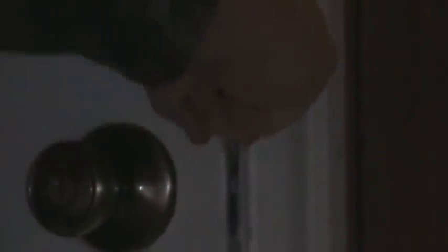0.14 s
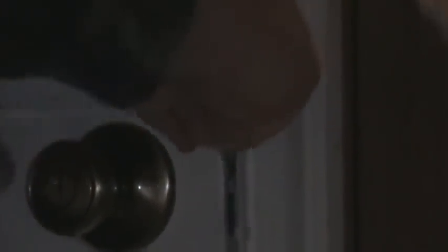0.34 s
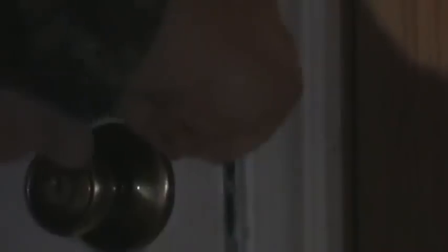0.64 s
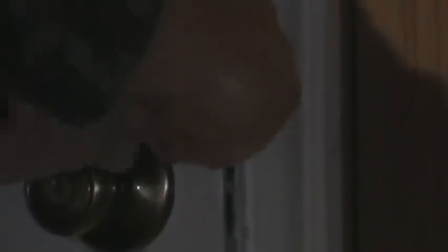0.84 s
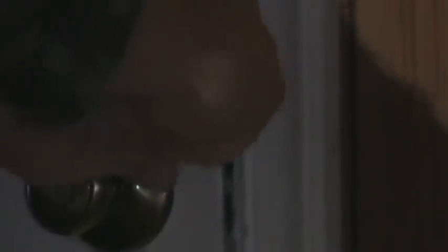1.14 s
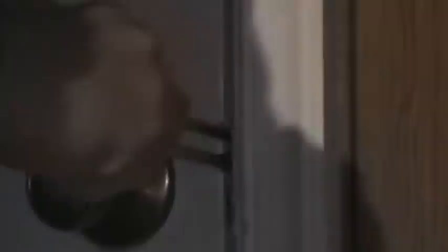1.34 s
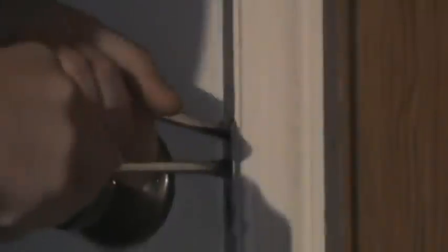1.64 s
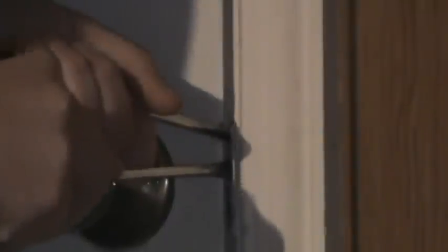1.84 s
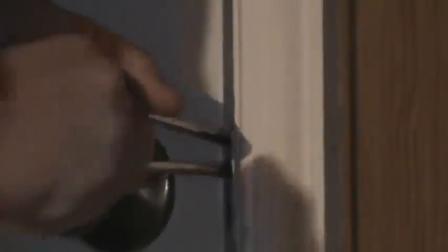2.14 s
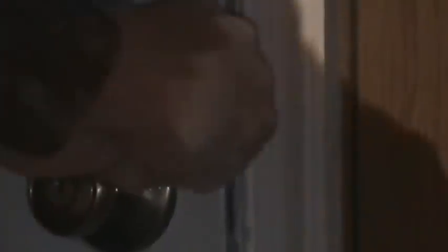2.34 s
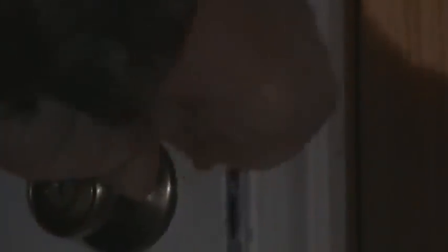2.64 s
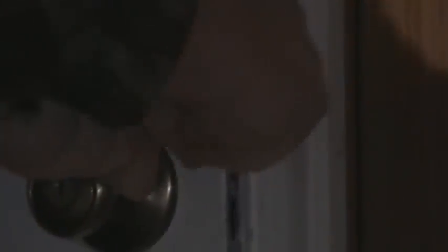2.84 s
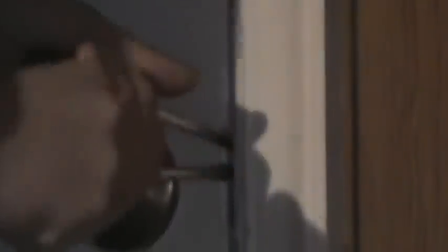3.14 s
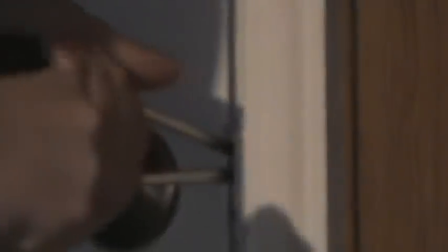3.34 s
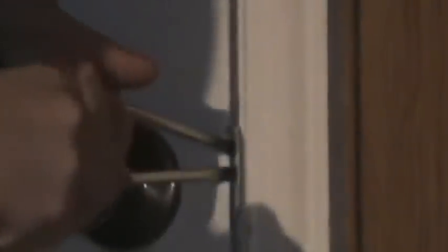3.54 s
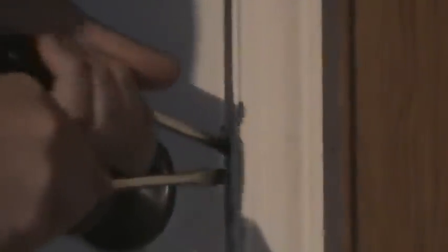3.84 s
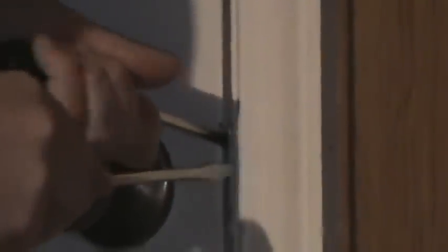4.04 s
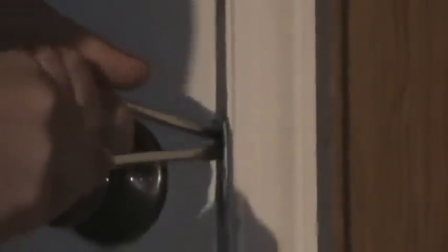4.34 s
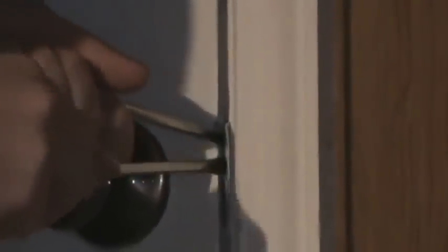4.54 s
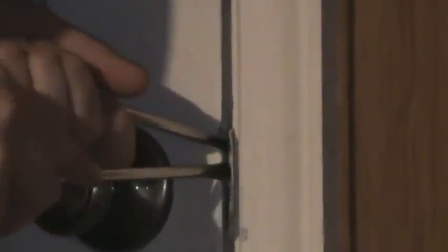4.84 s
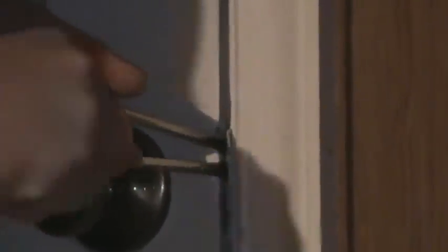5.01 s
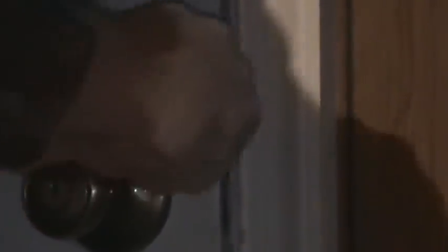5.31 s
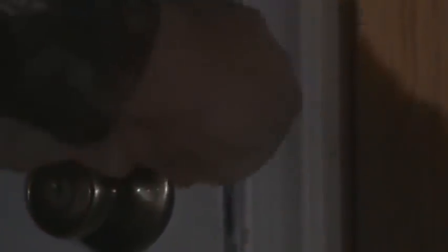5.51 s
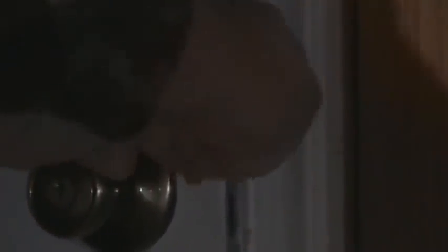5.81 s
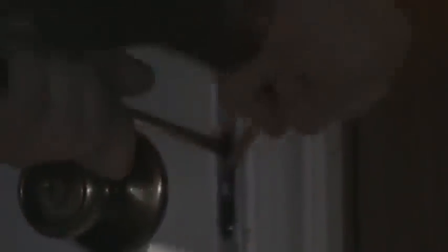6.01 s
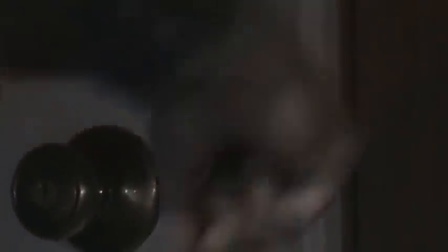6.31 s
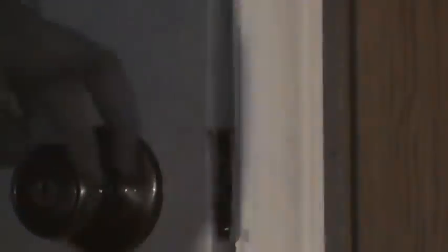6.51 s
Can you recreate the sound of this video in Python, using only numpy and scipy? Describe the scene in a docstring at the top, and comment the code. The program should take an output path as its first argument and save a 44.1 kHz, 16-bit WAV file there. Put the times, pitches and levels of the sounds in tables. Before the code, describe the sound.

Thin steel blades click, scrape and snap at a door latch, the door knocking in its frame, over camera hiss and faint whirring ticks.

```python
"""Indoors, close to a door: thin steel blades pry at its latch, just in front of a camera's stereo microphone.
Blades click on each other, tap and scrape the wooden jamb, then snap off the latch until the door knocks.
The door shifts, more jamb, latch and blade contacts follow, it knocks again; a last flurry of clicks and
shoves ends the scene. Contacts are noise bursts ringing resonances in a small room; throughout, the camera's
drive adds noise ticks and wavering sine chirps over shaped hiss."""
import sys
import numpy as np
from scipy import signal
from scipy.fft import rfft, irfft, next_fast_len
from scipy.io import wavfile
from scipy.ndimage import uniform_filter1d

SR = 44100
rng = np.random.default_rng(int(sys.argv[2]) if len(sys.argv) > 2 else 0)


def store_pcm(level_fs):
    """Save levels as 16-bit WAV."""
    pcm = np.round(np.clip(level_fs, -1, 1) * 32767).astype(np.int16)
    wavfile.write(sys.argv[1], SR, np.atleast_2d(pcm).T)


N = 294147  # length in samples

# Contacts of five kinds. Each row: start in seconds, nominal drag time in seconds (sharpness shortens or
# lengthens the slips), ring level in dB, brightness in dB per octave, thud of the door in dB.
# Steel on steel.
BLADE_CONTACTS = [(0.0612, 0.0008, -35, -0.5, -66), (0.0695, 0.00056, -37.5, -1.5, -66),
                  (3.3034, 0.00011, -38.5, 0.8, -66), (5.2542, 0.00035, -58, -3, -61),
                  (5.4268, 0.00048, -51.5, -6, -65), (5.6915, 0.001, -67, 4.5, -89),
                  (6.2095, 0.003, -56, 2.5, -57), (6.2265, 0.00047, -51.5, 2.5, -53),
                  (6.25, 0.0026, -43.5, 1.5, -51), (6.2605, 0.0012, -41.5, 1.2, -58),
                  (6.3224, 0.00099, -42, 6.5, -70), (6.3595, 0.00026, -67.5, 9.5, -76)]
# Blade on the sprung latch; at 3.385 a faint chirp of the drive, made the same way.
LATCH_CONTACTS = [(1.335, 0.0028, -45.5, -1, -51), (1.3705, 0.0015, -51.5, -0.3, -55),
                  (1.5138, 0.00034, -36.5, 1.6, -66), (1.539, 0.0023, -53, -1, -82),
                  (1.579, 0.0053, -49, -2, -83), (1.6385, 0.00074, -40, 1.5, -63),
                  (1.6445, 0.0013, -48.5, 4.5, -67), (1.87, 0.032, -64.5, -4.5, -66),
                  (3.1846, 0.0018, -34.5, 0.7, -50), (3.5, 0.018, -65, -6.5, -73),
                  (4.222, 0.0084, -52, -3.5, -59), (4.4962, 0.0019, -40.5, 0, -62.5),
                  (4.565, 0.017, -54, 1.5, -76), (3.385, 0.004, -57, -3.5, -78),
                  (4.797, 0.0024, -66, -3, -64)]
# Blade on the wooden jamb.
JAMB_CONTACTS = [(0.6562, 0.00052, -48.5, 0, -49), (0.87, 0.0013, -44.5, 1, -51),
                 (0.9503, 0.0022, -58, -6.5, -56), (1.035, 0.0003, -56.5, 0.5, -52.5),
                 (1.058, 0.012, -55.5, 1.7, -59), (1.071, 0.00085, -55.5, 0.5, -58),
                 (1.095, 0.012, -54.5, 0.7, -54.5), (3.018, 0.0028, -61.5, -2, -70),
                 (3.056, 0.00062, -61, -5.5, -61), (3.078, 0.002, -37.5, 1.3, -48.5)]
# The door knocks against the latch.
DOOR_KNOCKS = [(2.2236, 0.0018, -31.5, 2.5, -34.5), (2.241, 0.0037, -55, -8.5, -40),
               (2.435, 0.026, -64.5, -2, -53), (5.139, 0.0079, -66, -2, -57.5),
               (5.2755, 0.0031, -43, -0.5, -46)]
# Soft shoves of the door in its frame, and the low ringing on of the door after one (2.82, 2.91).
DOOR_SHIFTS = [(0.01, 0.022, -78, 5, -56), (0.21, 0.048, -77.5, -3, -67), (1.145, 0.013, -73.5, -1.5, -65),
               (2.715, 0.0068, -69, 0.5, -51), (2.738, 0.012, -59, 1, -46),
               (2.752, 0.0033, -60.5, 0.5, -53), (2.82, 0.023, -87, -1, -66), (2.91, 0.016, -93, -1, -60.5),
               (5.48, 0.015, -84, -3, -61), (5.972, 0.018, -60.5, 0.5, -45), (6.002, 0.0016, -54, 2, -40),
               (6.015, 0.0045, -49.5, 3, -40), (6.035, 0.018, -56, -1, -42), (6.16, 0.043, -64, -1, -57.5),
               (6.23, 0.005, -50.5, 6, -48.5), (6.589, 0.02, -63, -1, -58)]

# Resonances of the bodies. Each row: frequency in Hz, width in Hz before damping, relative level in dB.
# Steel blades touching.
BLADE_RESONANCES = [(251, 65, 3.5), (484, 80, -17), (668, 18, -22), (1190, 28, -7), (1350, 140, -12.5),
                    (1450, 44.0, -31), (1700, 54, 2), (1933, 51, -1.5), (2934, 690, 6), (3400, 300, -3.5),
                    (4255, 330, 3), (4900, 220, -2), (5640, 130, -7), (6580, 660, 5.5), (7250, 300, 5),
                    (8230, 72, 1), (9210, 240, 3.5), (10480, 160, 5)]
# Blade and latch.
LATCH_RESONANCES = [(268, 150, -18.5), (728, 23, -5), (893, 190, 7), (1056, 31, -3), (1160, 84, -13),
                    (1400, 44, -14), (1580, 410, -6.5), (1873, 300, 1), (2170, 140, -12.5),
                    (2446, 140, -2.5), (2930, 290, 1.5), (3320, 28, -25.5), (4050, 180, -15),
                    (4920, 370, -2.5), (5280, 140, 0.5), (5970, 340, 1), (6330, 200, -0.5),
                    (7490, 120, -0.5)]
# Blade and jamb.
JAMB_RESONANCES = [(229, 230, -1), (428, 75, -1), (506, 100, -3), (860, 630, -3), (1270, 83, 1),
                   (1470, 190, -4), (1677, 120, -4), (1864, 140, -8.5), (2640, 230, 3), (2980, 530, -1),
                   (4340, 250, -5), (5760.0, 40, -16), (6250, 61.0, -16), (7200, 57.0, 2), (7540, 34, -26)]
# Knocked door.
DOOR_RESONANCES = [(39.8, 15.4, -1), (81.6, 5.1, -17), (144, 36, -12.5), (177.3, 24, -3.5), (260, 19, -6),
                   (346, 290, -10.5), (516, 19, -4.5), (758, 194, 1), (868, 25, -2), (947, 50, -11),
                   (1373, 32, -11.5), (1580, 4.3, -9), (1880, 68, -12.5), (2180, 63, -14.5),
                   (2410, 39, -18), (2330, 35, -21), (2710, 230, -11), (3770, 120, -25), (4250, 140, -12),
                   (4850, 340, -23), (5130, 310, -13), (5560, 49, -14.5), (7585, 40, -8.5), (8200, 38, -31)]
# Shoved door.
SHIFT_RESONANCES = [(39.2, 10.6, 9.5), (64.7, 32, -7), (129.7, 27, 2.5), (155.4, 16, -3), (179.6, 6.9, 2),
                    (238, 14.7, -2), (359, 6.7, -24), (476, 31, -21.5), (606, 86, -20), (796, 70, -24),
                    (1210, 18.0, -21), (1500.0, 750, -18.5)]

# Registers: rumble, thud, wood, ring, steel tip. Each row: low edge in Hz, high edge in Hz.
REGISTERS = [(25, 100), (100, 400), (400, 1300), (1300, 4500), (4500, 15000)]
# Treble lost to the width of the contact. Each row: frequency in Hz, relative gain in dB.
CONTACT_TREBLE = [(6000, 2.5), (9000, 2.5), (11000, -1.5), (12000, -8), (15500, -19)]

# Decay of the small room. Each row: frequency in Hz, time to fall 60 dB in seconds.
ROOM_DECAY = [(40, 0.71), (150, 0.54), (500, 0.32), (1500, 0.23), (3000, 0.28), (7000, 0.28), (14000, 0.19)]
# Strength of the room. Each row: frequency in Hz, room over direct sound in dB.
ROOM_LEVEL = [(40, 0.5), (200, 8), (700, 13), (1500, 3), (3000, 1), (6000, -5.5), (14000, -7)]
# Width of the room. Each row: frequency in Hz, left-right likeness (1 is mono).
ROOM_LIKENESS = [(60, 1), (200, 0.98), (600, 0.88), (1200, 0.33), (3000, 0.43), (10000, 0.25)]

# Colour of the drive's ticks. Each row: frequency in Hz, relative level in dB per Hz.
TICK_COLOUR = [(1000, -28), (2200, 0.5), (2650, -6.5), (3150, -2.5), (3900, -26), (4900, -6.5),
               (6000, -14.5), (12000, -19.5)]
# Stretches in which the drive whistles its lower pitch more often. Each row: start and end in seconds.
LOW_CHIRP_BUSY = [(1.9, 2.47), (2.54, 2.75), (4.78, 5.24), (5.61, 5.8)]
# The same for the higher pitch. Each row: start and end in seconds.
HIGH_CHIRP_BUSY = [(0.57, 0.81), (2.47, 2.5), (3.34, 3.71), (5.51, 5.7)]
# Colour of the hiss. Each row: frequency in Hz, relative level in dB per Hz.
HISS_COLOUR = [(25, -7), (60, 6), (120, -0.5), (300, -4), (550, -6.5), (800, -8), (1100, -12), (2000, -7),
               (2700, -13), (4800, -12.5), (6000, -15.5), (8000, -16.5), (15000, -21.5)]
# Width of the hiss. Each row: frequency in Hz, left-right likeness (1 is mono).
HISS_LIKENESS = [(60, 1), (180, 0.95), (550, 0.053), (1650, 0.011), (5000, 0.022), (15000, 1)]

LEAD_S = .008  # silence ahead of each contact's slips
DRIVE_HZ, FIRST_TICK_S = 29.97, .0135  # tick rate of the drive, its first tick
TOP_HZ = 15700  # band limit of the camera


def blade_on_blade():
    """Steel clicks on steel: short slips, a clear crack and a strong tip."""
    return contacts(BLADE_CONTACTS, BLADE_RESONANCES, crack_db=-18, grit=0.26, sharp=0.93, damping=0.84,
                    grip_db=0.5, rumble_db=-4, wood_db=-15, tip_db=-0.36)


def blade_on_latch():
    """The blade snaps off or drags on the sprung latch, with a strong crack; one row is a faint drive chirp."""
    return contacts(LATCH_CONTACTS, LATCH_RESONANCES, crack_db=-14, grit=0.6, sharp=1.02, damping=0.96,
                    grip_db=1.5, rumble_db=-7, wood_db=-8.5, tip_db=-6.5)


def blade_on_jamb():
    """The blade taps and scrapes wood: gritty slips whose resonances vary from contact to contact."""
    return contacts(JAMB_CONTACTS, JAMB_RESONANCES, crack_db=-26, grit=1.0, sharp=1.0, damping=0.84,
                    grip_db=5.0, rumble_db=-9.5, wood_db=-5.5, tip_db=-8.0)


def door_knocks():
    """The door knocks against the latch: its low and wooden resonances carry the blow."""
    return contacts(DOOR_KNOCKS, DOOR_RESONANCES, crack_db=-52, grit=0.42, sharp=1.25, damping=1.0,
                    grip_db=2.0, rumble_db=-0.5, wood_db=2.0, tip_db=-2.5)


def door_shifts():
    """Soft shoves of the door in its frame and its low ringing on after one, heavy in wood and rumble."""
    return contacts(DOOR_SHIFTS, SHIFT_RESONANCES, crack_db=-46, grit=0.42, sharp=1.44, damping=0.93,
                    grip_db=2.5, rumble_db=-0.5, wood_db=6, tip_db=-6.0)


def contacts(table, modes, crack_db, grit, sharp, damping, grip_db, rumble_db, wood_db, tip_db):
    """Bursts of slips ring a body; a push thuds the door, a harder edge tilts the ring from wood to steel tip."""
    out = np.zeros((2, N))
    t = np.arange(SR * 2 // 3) / SR
    # every contact favours other modes
    grip = amp(grip_db * rng.standard_normal((len(table), len(modes))))

    def body(hz):
        crack = amp(crack_db) / (1 + 1j * hz / 5000)
        return amp(along(CONTACT_TREBLE, hz)) * (grip @ resonances(modes, damping, hz) + crack)

    bursts = np.array([slips(t, row[1] / sharp, grit) for row in table])
    struck = filtered(bursts, body)
    splits = [signal.butter(4, edges, "band", fs=SR, output="sos") for edges in REGISTERS]
    octaves = np.log2(REGISTERS[3][1] / REGISTERS[3][0])  # from one register to the next
    for (s, drag, ring_db, bright, thud_db), sound in zip(table, struck):
        heard = signal.fftconvolve(sound[None], room(), axes=1)[:, :len(t)]
        span = .02 + 3 * drag  # seconds over which the level is set
        tilt = bright * octaves
        levels = (thud_db + rumble_db, thud_db, ring_db + wood_db - tilt,
                  ring_db, ring_db + tip_db + tilt)
        for split, (low, high), db in zip(splits, REGISTERS, levels):
            part = signal.sosfilt(split, heard)
            attack_s = LEAD_S + span + 2 / high  # low notes take longer to speak
            attack = part.mean(0)[:round(attack_s * SR)]
            add(out, s - LEAD_S, amp(db) * part * np.sqrt(span * SR) / np.linalg.norm(attack))
    return out


def slips(t, drag, grit, even=0.39):
    """A swelling and fading cluster of tiny slips, so many that their spectrum partly evens out."""
    u = np.maximum(t - LEAD_S, 0) / drag
    # slip size changes every 32 samples
    sizes = np.exp(grit * rng.standard_normal(len(t) // 32 + 1)).repeat(32)[:len(t)]
    spectrum = rfft(rng.standard_normal(len(t)) * sizes * u * np.exp(-u))
    smooth = uniform_filter1d(abs(spectrum), size=90) + 1e-6
    return irfft(spectrum / smooth ** even, len(t))


def resonances(modes, damping, hz):
    """Complex response of each mode as a damped resonator, one row per mode."""
    rows = []
    for centre, width, db in modes:
        loss = 1j * hz * width * damping
        rows.append(amp(db) * loss / (centre * centre - hz * hz + loss))
    return np.array(rows)


def room(echo_s=.0019, echo=0.82, build_s=0.00035):
    """Direct sound, a quick echo off a near surface, its delay drawn at random each time, a diffuse tail."""
    n = SR // 2
    hz, t, noise = signal.stft(pair(n, ROOM_LIKENESS), SR, nperseg=256)
    t60 = along(ROOM_DECAY, hz)[:, None]
    gain = amp(along(ROOM_LEVEL, hz))[:, None] * np.sqrt(2 * np.log(1000) / (t60 * SR))
    tail = signal.istft(noise * gain * amp(-60 * t / t60), SR, nperseg=256)[1][:, :n]
    tail *= 1 - np.exp(-(np.arange(n) / SR / build_s) ** 2)  # the tail builds up
    tail[:, 0] += 1  # direct sound
    add(tail, echo_s * rng.uniform(.8, 1.2), echo * np.hanning(7) / 3)
    return tail


def camera():
    """The camera's own noise at the microphone: drive ticks, chirps at two pitches, steady hiss."""
    low = chirps(LOW_CHIRP_BUSY, hz=1900, step_hz=192, step_share=.3, length_s=.016, db=-56.5,
                 idle_share=.22, busy_share=.6)
    high = chirps(HIGH_CHIRP_BUSY, hz=4785, step_hz=140, step_share=.2, length_s=.022, db=-61,
                  idle_share=.25, busy_share=.75)
    return low + high + drive_ticks() + hiss()


def drive_ticks(tick_s=0.0032, uneven_db=3):
    """The drive ticks unevenly about thirty times a second: coloured noise dying away after each beat."""
    beat, since = np.divmod(np.arange(N) / SR - FIRST_TICK_S, 1 / DRIVE_HZ)
    size = amp(uneven_db * rng.standard_normal(int(beat[-1]) + 1))[beat.astype(int)]
    bursts = rng.standard_normal(N) * size * np.exp(-since / tick_s)
    ticks = filtered(bursts, lambda hz: amp(along(TICK_COLOUR, hz)))
    return amp(-71) * ticks / rms(ticks)


def chirps(busy, hz, step_hz, step_share, length_s, db, idle_share, busy_share, scatter_db=2.5,
           lag_s=0.0059, wander=.012, rasp=0.14, rasp_hz=200):
    """Some ticks of the drive set off a short, slightly raspy whistle, now and then a step higher."""
    out = np.zeros(N)
    t = np.arange(SR // 25) / SR - .02  # centred on the whistle
    swell = np.cos(np.pi * np.clip(t / length_s, -.5, .5))
    ticks = np.arange(FIRST_TICK_S, N / SR, 1 / DRIVE_HZ)
    wavers = filtered(rng.standard_normal((len(ticks), len(t))), lambda f: np.exp(-(f / rasp_hz) ** 2))
    chances = rng.random((len(ticks), 2))
    scatter = rng.standard_normal((len(ticks), 2))
    for s, (chance, step), (size, detune), waver in zip(ticks, chances, scatter, wavers):
        is_busy = any(start < s < end for start, end in busy)
        if chance < (busy_share if is_busy else idle_share):
            pitch = hz * (1 + wander * detune) + step_hz * (step < step_share)
            phase = 2 * np.pi * pitch * t + rasp * waver / rms(waver)  # rasp in radians
            add(out, s + lag_s + t[0], amp(db + scatter_db * size) * swell * np.sin(phase))
    return out


def hiss():
    """Steady stereo noise of the camera, coloured by frequency."""
    noise = filtered(pair(N, HISS_LIKENESS), lambda hz: amp(along(HISS_COLOUR, hz)))
    return amp(-59.5) * noise / rms(noise)


def pair(n, alike):
    """White stereo noise with a given left-right likeness, from a mid and a side noise."""
    def weights(hz):
        turn = np.arccos(np.clip(along(alike, hz), -1, 1)) / 2
        return np.array([np.cos(turn), np.sin(turn)])

    mid, side = filtered(rng.standard_normal((2, n)), weights)
    return np.array([mid + side, mid - side])


def amp(db):
    """Decibels to gain."""
    return 10 ** (np.asarray(db) / 20)


def rms(x):
    """Root mean square."""
    return np.sqrt(np.mean(x ** 2) + 1e-20)


def along(points, hz):
    """(Hz, value) points read on a log axis."""
    f, v = np.transpose(points)
    return np.interp(np.log(hz + 1), np.log(f + 1), v)


def filtered(x, response):
    """x times a complex response of frequency."""
    n = x.shape[-1]
    m = next_fast_len(n + 8192)  # room for the ringing
    return irfft(rfft(x, m) * response(np.fft.rfftfreq(m, 1 / SR)), m)[..., :n]


def add(out, s, sound):
    """Mix a sound into out at time s."""
    part = out[..., max(0, round(s * SR)):][..., :sound.shape[-1]]
    part += sound[..., :part.shape[-1]]


def scene():
    """All kinds of contact, just in front of the camera and a touch to the right, over its own noise."""
    door_work = blade_on_blade() + blade_on_latch() + blade_on_jamb() + door_knocks() + door_shifts()
    return door_work * amp([[-.25], [.25]]) + camera()


def record(dry):
    """The camera keeps nothing above its band limit."""
    return filtered(dry, lambda hz: hz < TOP_HZ)


dry = scene()
out = record(dry)
store_pcm(out)
```